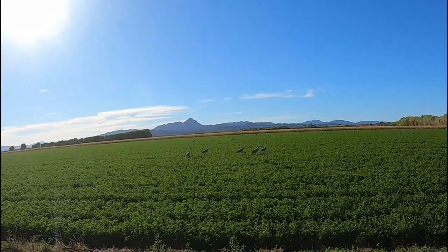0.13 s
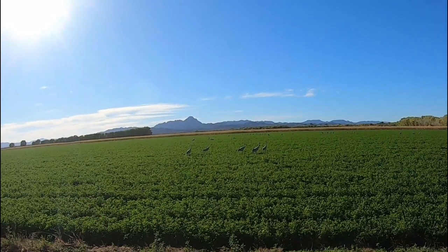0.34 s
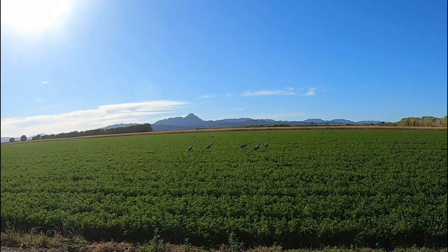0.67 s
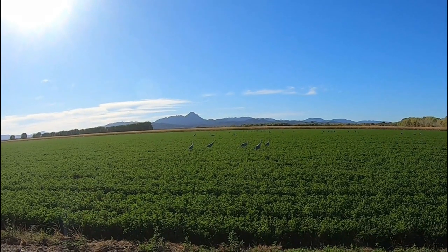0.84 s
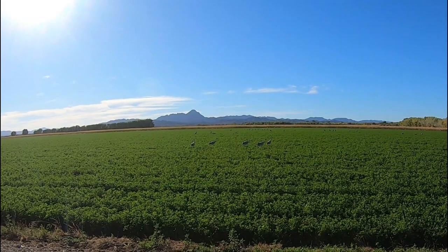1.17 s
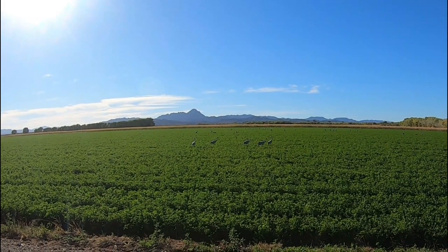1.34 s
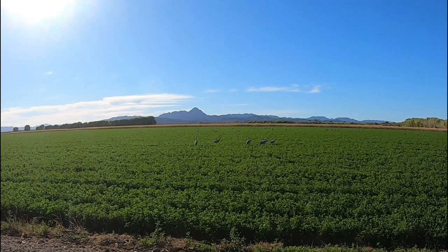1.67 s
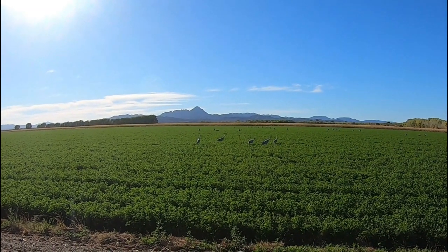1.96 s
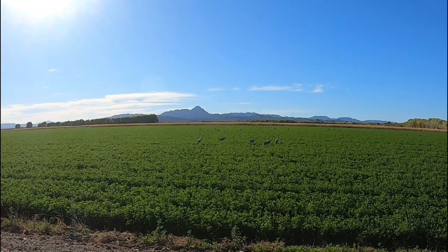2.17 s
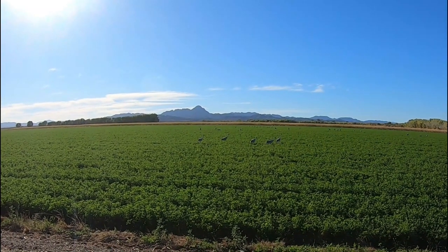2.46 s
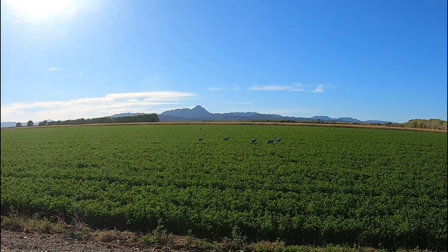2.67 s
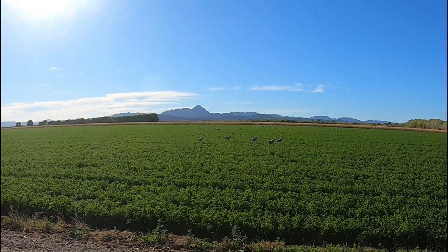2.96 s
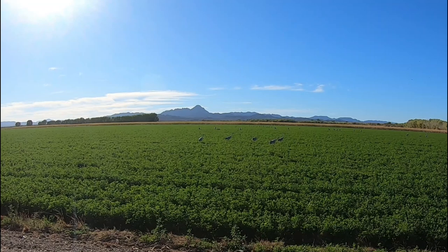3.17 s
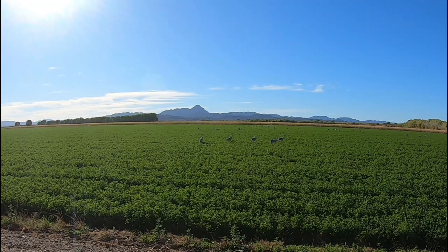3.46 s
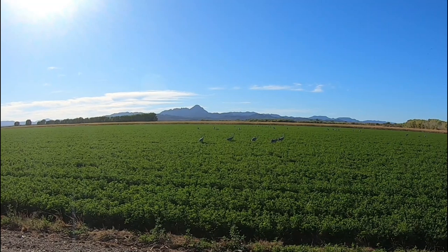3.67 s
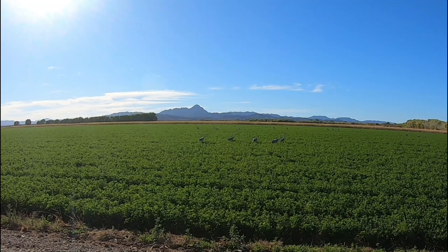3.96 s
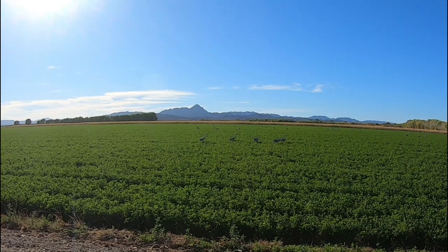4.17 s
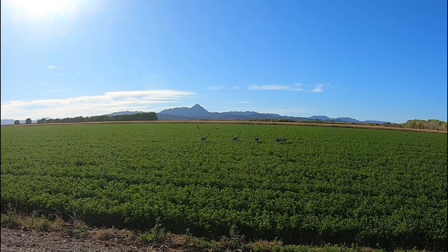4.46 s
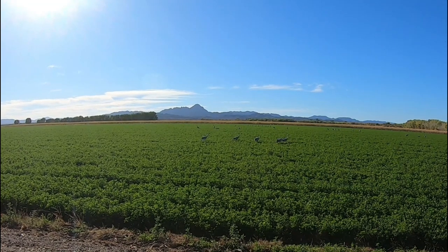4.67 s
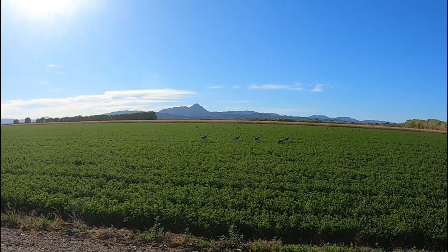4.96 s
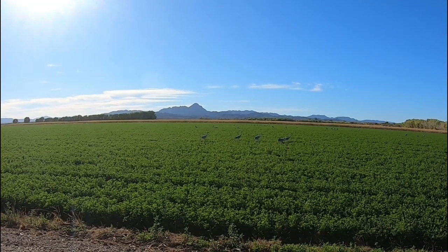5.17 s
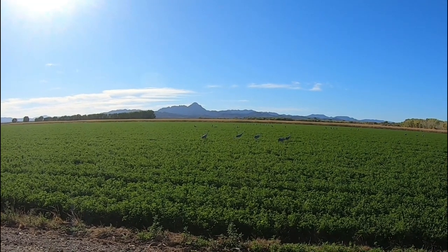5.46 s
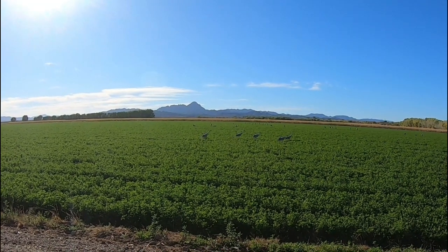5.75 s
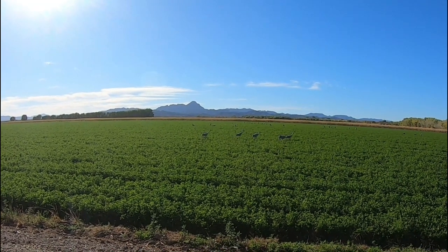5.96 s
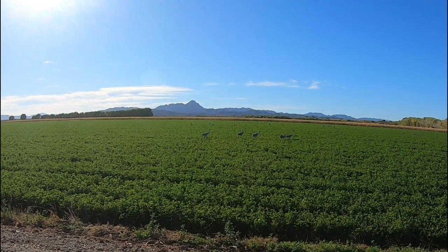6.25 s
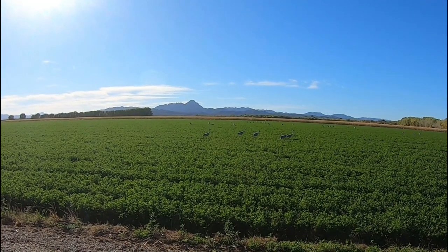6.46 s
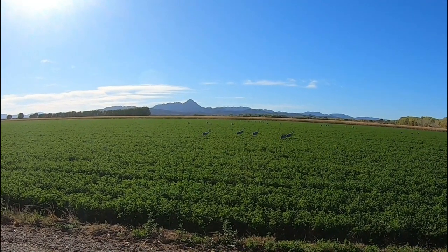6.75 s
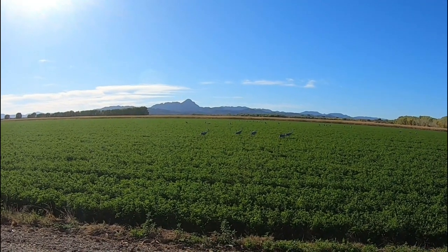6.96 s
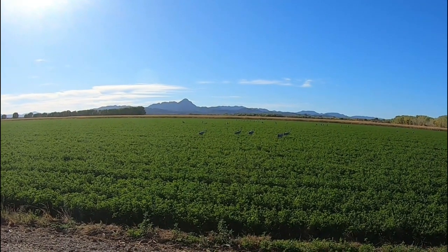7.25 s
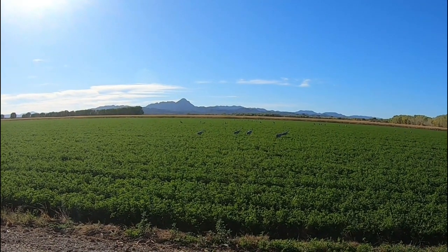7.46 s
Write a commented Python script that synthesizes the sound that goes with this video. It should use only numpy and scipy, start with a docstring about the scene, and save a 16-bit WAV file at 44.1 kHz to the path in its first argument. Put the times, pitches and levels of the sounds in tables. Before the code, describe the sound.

A car engine idles throughout with a low, steady throb and rumble, under the faint hiss of an open field. An adult crane calls at about 0.3, 1.9, 3.9 and 5.5 seconds. Each call lasts about half a second: a short, hoarse rising note, then a loud rolling rattle that speeds up and fades. The calls grow slightly louder and brighter each time. A young crane overlaps each one, more softly, with a thin rising whistle and a run of six or seven high trilled peeps that sink in pitch. Its whistle comes during the first two calls and just ahead of the last two, and it whistles once more alone at 7.5 seconds. A few soft ticks dot the background, with two very faint high rustles near 1.4 and 5.2 seconds. The calls carry clearly, with only a weak, short echo.

```python
"""An idling car throbs under the faint hiss and ticks of a flat field; then two cranes call.
The adult gives four bugles, made by a membrane vibrating in its long windpipe: each is a short rising
note, then a rattle that speeds up and fades. A young bird overlaps each with a thin rising whistle
and a run of trilled peeps, and whistles once more at the end. The crop and the ground scatter the
calls, and two very faint rustles pass between them."""
import sys
import numpy as np
from scipy import signal
from scipy.fft import rfft, irfft, next_fast_len
from scipy.io import wavfile
from scipy.ndimage import uniform_filter1d, map_coordinates

SR = 44100
rng = np.random.default_rng(int(sys.argv[2]) if len(sys.argv) > 2 else 0)


def master_out(mix):
    """Clip the mix to full scale and print it as 16-bit PCM to the path in sys.argv[1]."""
    frames = np.transpose(np.atleast_2d(mix))
    ceiling = np.clip(frames, -1, 1)
    pcm = np.round(ceiling * 32767).astype(np.int16)
    wavfile.write(sys.argv[1], SR, pcm)


N = 335601
RATTLE_PEAK_HZ = 897.6  # base pitch where a rattle is strongest


def amp(db):
    """Turn decibels into a number to multiply by."""
    return 10 ** (np.asarray(db) / 20)


def unit(x):
    """Scale a signal to an average (rms) size of 1."""
    return x / np.sqrt(np.mean(x ** 2) + 1e-20)


def along(points, hz):
    """Read between (frequency_hz, value) points, with octaves evenly spaced."""
    point_hz, values = np.transpose(points)
    return np.interp(np.log(hz + 1), np.log(point_hz + 1), values)


def curves(rows):
    """Turn rows of (time_s, values...) into one curve for each column of values."""
    times, *columns = np.transpose(rows)
    return [np.interp(np.arange(N) / SR, times, column) for column in columns]


def wobble(rate, size=N):
    """A smooth curve through `rate` random points a second."""
    points = rng.standard_normal(int(size * rate / SR) + 4)
    return map_coordinates(points, [np.arange(size) * rate / SR])


def filtered(x, response):
    """Scale and delay each frequency of x as response(hz) says."""
    size = next_fast_len(N + SR // 2)
    return irfft(rfft(x, size) * response(np.fft.rfftfreq(size, 1 / SR)), size)[..., :N]


def coloured(x, colour):
    """Shape the tone of x with (frequency_hz, gain_db) points."""
    return filtered(x, lambda hz: amp(along(colour, hz)))


def turning(hz):
    """The phase (running angle) of a wave that follows a pitch curve."""
    return 2 * np.pi * np.cumsum(hz) / SR


def fade(t, length, rise, fall):
    """Fade smoothly in and out; all times are in seconds."""
    return np.sin(np.pi / 2 * np.clip(np.minimum(t / rise, (length - t) / fall), 0, 1)) ** 2


def add(track, start_s, sound):
    """Mix a sound into the track."""
    part = track[max(round(start_s * SR), 0):][:len(sound)]
    part += sound[:len(part)]


def rush(colour, patchy_db):
    """Stereo rushing noise with randomly louder and softer patches."""
    # how alike left and right are (1 = the same): frequency_hz, likeness
    alike = [(60, 0.9), (120, 0.97), (250, 1), (520, 0.85), (1080, 0.0069), (2210, 0.48), (4560, 0.36),
             (9380, -0.32)]
    bands = signal.stft(rng.standard_normal((2, N)), nperseg=512)[2]
    patches = uniform_filter1d(rng.standard_normal(bands.shape[1:]), size=6, axis=0)
    patches = uniform_filter1d(patches, size=14, axis=1)
    pair = signal.istft(bands * amp(patchy_db * unit(patches)), nperseg=512)[1][:, :N]
    width = lambda hz: np.arccos(np.clip(along(alike, hz), -1, 1)) / 2
    shares = lambda hz: np.array([np.cos(width(hz)), np.sin(width(hz))])
    mid, side = filtered(pair, lambda hz: amp(along(colour, hz)) * shares(hz))
    return unit(np.array([mid + side, mid - side]))


def engine():
    """The exhaust throbs each time the engine fires, over a rumble and a steady fan tone."""
    # the drifting idle: time_s, firing_hz, throb_db, octave_db
    idle = [(0.06, 25.23, -28, -40), (0.54, 25.09, -27.5, -41), (0.87, 24.55, -31.5, -37.5),
            (2.0, 24.27, -30, -40), (2.17, 24.81, -30, -38), (2.75, 26.09, -23, -49),
            (2.81, 26.26, -23, -41), (2.94, 25.98, -23.5, -47.5), (3.38, 25.43, -26, -43),
            (4.0, 24.39, -34.5, -35), (4.46, 24.39, -31, -36), (4.86, 24.39, -37, -36),
            (4.94, 23.9, -35, -34), (7.55, 23.76, -31.5, -32.5)]
    # exhaust overtones: multiple_of_firing_rate, level_db
    exhaust = [(3, -49.5), (4, -53.5), (5, -48.5), (6, -55.5), (7, -51.5), (8, -60), (9, -64.5),
               (11, -61.5)]
    # tone of the rumble: frequency_hz, gain_db
    rumble_colour = [(15, -9.5), (35, 3.5), (70, -1.5), (115, -3), (170, -7.5), (260, -9.5), (400, -16),
                     (700, -26), (1500, -61), (4000, -110)]
    firing_hz, throb_db, octave_db = curves(idle)
    phase = turning(firing_hz)
    throb = amp(throb_db) * np.sin(phase) + amp(octave_db) * np.sin(2 * phase)
    drone = np.zeros(N)
    for multiple, db in exhaust:
        level = amp(db + 1.75 * wobble(4))
        drone += level * np.sin(multiple * phase + .19 * wobble(6) + rng.uniform(0, 2 * np.pi))
    fan = amp(-50 + 1.7 * wobble(3)) * np.sin(turning(109 + .6 * wobble(4)))
    lean_right = amp([[-.35], [.35]])
    rumble = amp(-43) * rush(rumble_colour, patchy_db=.5)
    return np.sqrt(2) * (throb + drone + fan) * lean_right + rumble


def air():
    """An even hiss, and a thin high band that comes and goes like far insects."""
    # tone of the field's hiss: frequency_hz, gain_db
    hiss_colour = [(260, -43), (450, -2), (493, -9), (575, -4.5), (621, -8.5), (671, 5), (735, -11),
                   (794, -7), (951, -10.5), (1460, -9.5), (1930, -12.5), (2570, -21), (5290, -30.5),
                   (5790, -33), (9830, -43.5), (12800, -79.5), (21600, -120)]
    thin_db, = curves([(0, -85.5), (4, -93), (5.3, -82.5), (6.3, -77), (7.6, -87)])
    thin = rush([(4500, -49), (5100, -4), (5350, -5.5), (5600, -11), (6200, -52.5)], patchy_db=3)
    hiss = amp(-54 + .63 * wobble(1.98)) * rush(hiss_colour, patchy_db=1)
    return hiss + amp(thin_db) * thin


def ticks():
    """Soft ticks in the field, each gone in a few hundredths of a second."""
    # the ticks: time_s, level_db
    events = [(0.029, -47), (1.1892, -50.5), (1.3554, -53), (2.657, -49), (2.8833, -51), (3.1357, -47),
              (4.6762, -46.5), (6.2063, -42.5)]
    # their tone: frequency_hz, gain_db
    colour = [(1000, -34), (2500, -2.5), (3400, 5), (5000, -13.5), (8000, -27), (12000, -43.5)]
    out, t = np.zeros(N), np.arange(SR // 10) / SR
    rise = 1 - np.exp(-t / .004)
    for time_s, db in events:
        add(out, time_s - .003, amp(db + 4 - 60 * t / .09) * rise * rng.standard_normal(len(t)))
    return coloured(out, colour)


def bugle(pitch, throat, tilt_db, scatter_db, smear, count, edge_db=0):
    """A membrane pulses through the adult's long windpipe; each note mixes its overtones anew."""
    k = np.arange(1, count + 1)[:, None]
    hz = k * pitch
    level_db = along(throat, hz) + tilt_db * np.log2(hz / 1000)  # more tilt sounds brighter
    level_db += scatter_db * (k > 1) * rng.standard_normal(k.shape)
    level_db += edge_db * along([(3800, 0), (5500, 1)], hz)  # treble only
    phase = k * turning(pitch) + smear * rng.standard_normal(k.shape)
    return np.sum(amp(level_db) * np.cos(phase), axis=0)


def rasp(level):
    """Air swirling in the windpipe adds a hoarse noise to the voice."""
    # tone of the rasp: frequency_hz, gain_db
    colour = [(450, -47.5), (620, 0.5), (850, 5.5), (1050, 5.5), (1450, -6), (1800, 1.5), (2200, 5),
              (2560, -12.5), (3200, 1.5), (4300, -22.5), (6200, -26), (9300, -31), (10500, -34),
              (15000, -58.5)]
    return level * unit(coloured(rng.standard_normal(N), colour))


def opening_notes():
    """The adult's first note starts hoarsely, swells as it slides up, then cracks and dies away."""
    # the notes: start_s, length_s, start_hz, top_hz, level_db, brightness_db_per_octave
    notes = [(0.319, 0.102, 509, 605, -36, -0.5), (1.915, 0.1, 522, 611.6, -34, -0.5),
             (3.915, 0.099, 527.5, 606.4, -35, 2.5), (5.539, 0.093, 558, 623.5, -34.5, 1)]
    # how the throat shapes the overtones: frequency_hz, gain_db
    throat = [(550, -9), (1120, 2.5), (1250, -1), (1580, -13.5), (1830, -5.5), (2400, -17.5), (3100, -10.5),
              (3600, -10), (4400, -23.5), (5500, -24.5), (6500, -35), (9500, -44), (14000, -70)]
    out, hoarse = np.zeros(N), np.zeros(N)
    for start_s, length_s, start_hz, top_hz, db, bright_db in notes:
        t = np.arange(int(length_s * SR)) / SR
        progress = t / length_s
        effort = np.interp(progress, [0, .2, .62, .8, 1], [0, .4, 1, .95, .3])
        crack = np.clip((progress - .82) / .07, 0, 1)
        pitch = start_hz + (top_hz - start_hz) * np.sin(np.pi / 2 * progress / .77)
        pitch *= 1 + (.0071 + .063 * crack) * wobble(500, len(t))
        tilt_db = bright_db + 1.2 - 7 * (1 - effort)  # brightest at full effort
        note = bugle(pitch, throat, tilt_db, scatter_db=.5, smear=.98, count=24)
        level = amp(db + 1.5 - 3.7 * (1 - effort))
        add(out, start_s, level * fade(t, length_s, rise=.025, fall=.013) * note)
        hoarse_db = -22 + 10 * np.exp(-progress / .13) + 14 * crack
        add(hoarse, start_s, amp(db + hoarse_db) * fade(t, length_s, rise=.0052, fall=.01))
    return out + rasp(hoarse)


def quickening(k, gap_s, extra_s, shrink):
    """Time of note k when the gaps start extra_s too long and shrink towards gap_s."""
    return k * gap_s + extra_s * (1 - shrink ** k) / (1 - shrink)


def rattle_notes():
    """Plan the notes: each rattle speeds up, peaks early, then sags in level and pitch and gives out."""
    # the adult's rattles: start_s, length_s, final_gap_s
    rattles = [(.4701, .374, .0367), (2.0651, .392, .0367), (4.0654, .402, .037), (5.6837, .392, .0357)]
    # the two aftershocks of a note: level_in_first_note_db, loss_per_note_db
    aftershocks = [(-3.5, 1), (-6, 4.5)]
    peak_note, give_out_s = 2.26, .033
    for call, (start_s, length_s, gap_s) in enumerate(rattles):
        # the bird calls harder each time
        db, bright_db, edge_db = -18 + .5 * call, -.45 + .5 * call, -4 + 2.5 * call
        for k in range(9):
            offset_s = quickening(k, gap_s, extra_s=.0368, shrink=.6224)
            if offset_s < length_s:
                sag = (k - peak_note) ** 2
                gain = amp(db - .45 * sag) * np.tanh((length_s - offset_s) / give_out_s)
                shocks_db = [first_db - loss_db * k for first_db, loss_db in aftershocks]
                yield start_s + offset_s, gain, RATTLE_PEAK_HZ - 5.8 * sag, shocks_db, bright_db, edge_db


def swell(t, rise, life):
    """A burst of vibration builds within a few cycles, collapses and leaves a weak ring."""
    t = np.maximum(t, 0)
    ring = .14 * np.exp(-t / .009)
    shape = (1 - np.exp(-(t / rise) ** 2)) * (np.exp(-(t / life) ** 4) + ring)
    return shape / shape.max()


def rattle():
    """Each note is a soft catch, a hard swell and two rougher aftershocks of one vibrating membrane."""
    # how the throat shapes the overtones: frequency_hz, gain_db
    throat = [(620, -6.5), (850, -0.5), (1450, -8), (1720, -13.5), (2200, -11), (2580, -30.5), (3300, -12),
              (4200, -23.5), (5000, -23), (6200, -29.5), (7800, -40), (9300, -43), (10500, -58.5),
              (15000, -66)]
    dulling_db_per_s = 78  # per octave, as a note rings on
    out, hoarse = np.zeros(N), np.zeros(N)
    t = np.arange(SR // 16) / SR - .008  # starts early to leave room for the catch
    for time_s, gain, hz, (second_db, third_db), bright_db, edge_db in rattle_notes():
        spacing_s = .00918 * (1 + .05 * rng.standard_normal())
        catch = amp(-20) * swell(t + .0065, rise=.0013, life=.003)
        first = swell(t - .0005, rise=.002, life=.0066)
        second = amp(second_db) * swell(t - spacing_s, rise=.0021, life=.01)
        third = amp(third_db) * swell(t - 2 * spacing_s, rise=.002, life=.011)
        strength = gain * (catch + first + second + third)
        ragged = np.clip(t / spacing_s, 0, 1) ** 3  # sets in once the first swell is over
        stall = np.exp(-((t - spacing_s) / .00189) ** 2)  # the membrane loses half a cycle here
        roughness = .013 + .032 * ragged + .16 * (1 - hz / RATTLE_PEAK_HZ)
        pitch = hz * (1.01 - .0568 * ragged - .15 * stall + roughness * wobble(1100, len(t)))
        snap_db = 3.7 * np.exp(-np.abs(t) / .00077)  # the first cycles snap hardest
        tilt_db = bright_db + snap_db - dulling_db_per_s * np.abs(t)
        note = bugle(pitch, throat, tilt_db, scatter_db=2, smear=.65, count=17, edge_db=edge_db)
        add(out, time_s + t[0], strength * note)
        puffs = 1 + .4 * np.cos(turning(pitch))
        add(hoarse, time_s + t[0], amp(bright_db - 15 + 3 * ragged) * strength * puffs)
    return out + rasp(hoarse)


def young_voice(pitch, second_db, third_db):
    """The young bird's thin voice: a slightly rough tone with two weak overtones."""
    # how strongly its throat sounds each pitch: pitch_hz, gain_db
    throat = [(2800, -2), (3400, 1.5), (4000, 2), (4600, -2), (5300, 1)]
    phase = turning(pitch * (1 + .027 * wobble(1500, len(pitch))))
    wave = np.sin(phase) + amp(second_db) * np.sin(2 * phase) + amp(third_db) * np.sin(3 * phase)
    return amp(along(throat, pitch) + 4.3 * wobble(600, len(pitch))) * wave


def whistles():
    """The young bird's quivering whistle swells and rises ever faster."""
    # the whistles: start_s, length_s, start_hz, end_hz, level_db
    notes = [(0.501, 0.06, 3110, 4040, -35), (2.099, 0.062, 3090, 4160, -35),
             (3.757, 0.052, 2810, 4030, -40.5), (5.367, .05, 3044, 3993, -36.5),
             (7.498, 0.05, 3020, 3990, -40.5)]
    out = np.zeros(N)
    for start_s, length_s, start_hz, end_hz, db in notes:
        t = np.arange(int(length_s * SR)) / SR
        quiver = np.sin(turning(125 * (1 + .087 * wobble(60, len(t)))))
        pitch = start_hz + (end_hz - start_hz) * (t / length_s) ** 1.7 + 50 * quiver
        level = amp(db - .5 + 1.6 * quiver) * fade(t, length_s, rise=.042, fall=.01)
        add(out, start_s, level * young_voice(pitch, second_db=-21.5, third_db=-56))
    return out


def peep(length_s, hz, overtone_db):
    """One peep arches up and down in pitch with a fast flutter, wider in the high peeps."""
    t = np.arange(int(length_s * SR)) / SR
    flutter = np.cos(turning(130 * (1 + .018 * wobble(60, len(t)))))
    arch = np.sin(np.pi * (t / length_s) ** 1.095)
    swing_hz = 180 + .36 * (hz - 3200)
    pitch = hz + 420 * (arch - .9) + 220 * (t / length_s - .5) + swing_hz * flutter
    level = amp(3.9 * (arch - 1.74)) * fade(t, length_s, rise=.0033, fall=.0026)
    return level * young_voice(pitch, overtone_db, third_db=-47)


def peeps():
    """Through a run the young bird's peeps come faster, grow longer, and sink in pitch and level."""
    # the runs: first_peep_middle_s, peep_count, final_gap_s, last_pitch_hz, level_db, fade_db, overtone_db
    runs = [(0.6411, 7, .0502, 3237, -31.5, 13.5, -18), (2.2436, 6, 0.052, 3450, -31, 12.5, -22.5),
            (3.906, 7, .0519, 3326, -33.5, 14, -27.5), (5.5131, 6, 0.052, 3380, -32, 14, -19.5)]
    first_hz, first_length_s, growth_s = 4240, .021, .0035
    out = np.zeros(N)
    for first_s, count, gap_s, last_hz, db, fade_db, overtone_db in runs:
        for k, progress in enumerate(np.linspace(0, 1, count)):
            middle_s = first_s + quickening(k, gap_s, extra_s=.0177, shrink=.371)
            length_s = first_length_s + growth_s * k
            hz = first_hz + (last_hz - first_hz) * progress ** 1.9
            level = amp(db - fade_db * progress ** 4.7)
            add(out, middle_s - length_s / 2, level * peep(length_s, hz, overtone_db))
    return out


def rustle():
    """Two very faint, high rustles."""
    db, = curves([(1.25, -110), (1.36, -73), (1.47, -110),
                  (4.7, -105), (4.95, -86), (5.2, -79), (5.4, -105)])
    colour = [(3000, -31), (6000, -2.5), (9000, -1), (11500, -9.5), (15000, -28.5)]
    return amp(db + 2 * wobble(25)) * rush(colour, patchy_db=-.5)


def left_and_right(x):
    """The body that holds the two microphones shades and delays each one differently."""
    # the shading: frequency_hz, left_minus_right_db
    shade = [(500, 0), (700, 3), (900, -0.5), (1150, -1), (1600, 1.5), (1900, 12.5), (2150, -1.5),
             (2400, 4.5), (2900, -0.5), (3800, 1.5), (4400, -0.5), (6000, 4.5), (6600, -3.5), (8200, 4.5)]
    # how far the left wave runs ahead: frequency_hz, lead_radians
    lead = [(700, -.2), (1050, 0), (1450, .8), (1750, 1.5), (1850, 1.5), (1950, -1.2), (2400, -.4),
            (3300, 0), (6000, .5)]
    sides = np.array([[.5], [-.5]])
    return filtered(x, lambda hz: amp(sides * along(shade, hz)) * np.exp(1j * sides * along(lead, hz)))


def echo(x, decay):
    """A blurred echo of the surroundings; decay lists (frequency_hz, time_to_fall_60_db_s)."""
    hz, t, bands = signal.stft(rng.standard_normal((2, SR // 2)), SR, nperseg=256)
    tail = signal.istft(bands * amp(-60 * t / along(decay, hz)[:, None]), SR, nperseg=256)[1]
    return signal.fftconvolve(x[None], tail / np.linalg.norm(tail[0]), axes=1)[:, :N]


def scene():
    """The calls arrive directly, off the crop and ground, and as a weak echo, over engine and air."""
    # what the crop lets straight through: frequency_hz, gain_db
    crop_shade = [(5500, 0), (8000, -3.5), (12000, -7)]
    # what the crop scatters, mostly treble: frequency_hz, gain_db
    crop_scatter = [(1200, -16.5), (4500, -22), (6000, -4), (7800, 1), (12000, 1.5)]
    # how long the weak echo lasts: frequency_hz, time_to_fall_60_db_s
    far_decay = [(700, 0.085), (3500, 0.18), (10000, 0.19)]
    adult = rattle() + opening_notes()
    young = whistles() + peeps()
    field = adult + young + ticks()
    direct = left_and_right(coloured(field, crop_shade))
    crop = echo(coloured(field, crop_scatter), [(1000, .032)])
    ground = echo(amp(-11.5) * adult + amp(-8) * young, [(800, .05), (8000, .06)])
    far = amp(-18) * echo(field, far_decay)
    return direct + crop + ground + far + engine() + air() + rustle()


def record(dry):
    """Cut away the very highest treble."""
    top_hz = 15400
    return signal.sosfiltfilt(signal.butter(16, top_hz, fs=SR, output="sos"), dry)


dry = scene()
out = record(dry)
master_out(out)
```